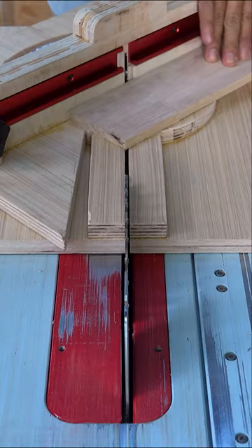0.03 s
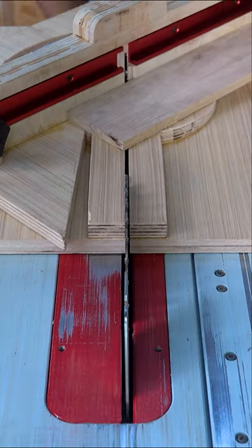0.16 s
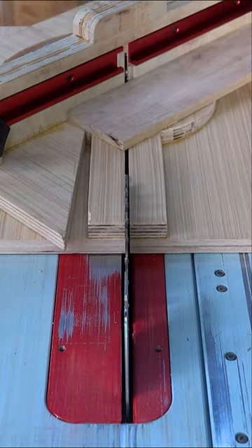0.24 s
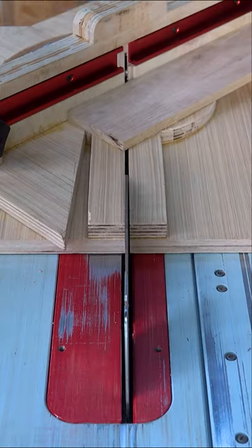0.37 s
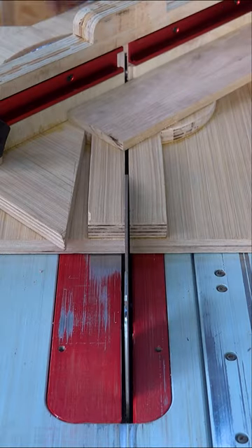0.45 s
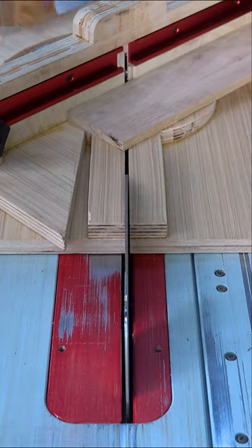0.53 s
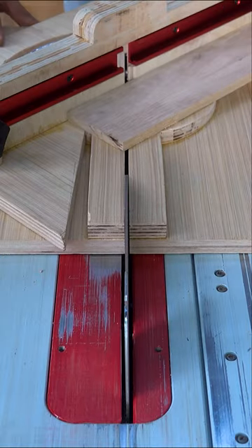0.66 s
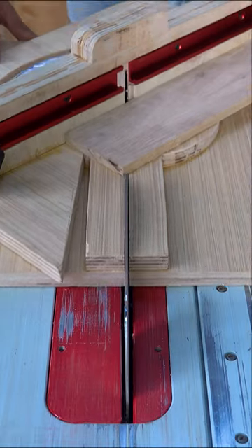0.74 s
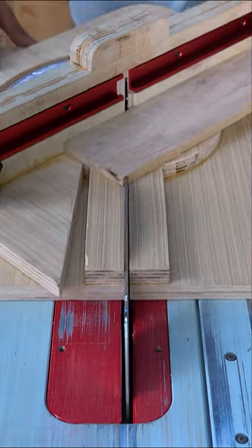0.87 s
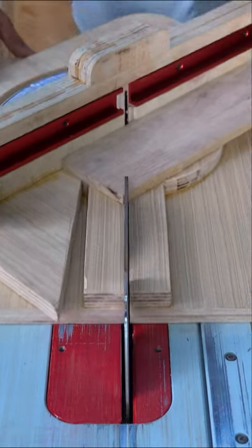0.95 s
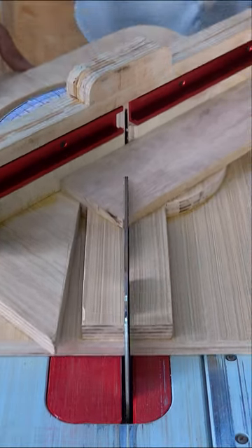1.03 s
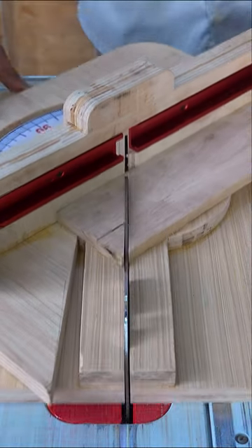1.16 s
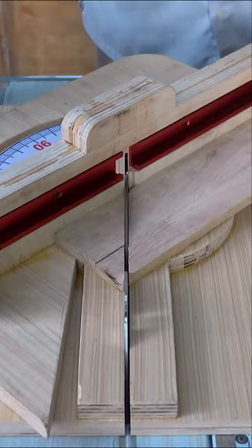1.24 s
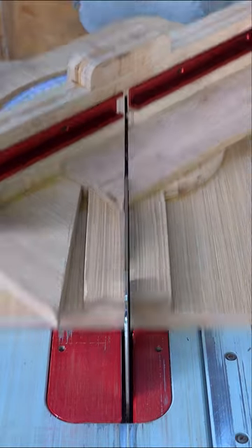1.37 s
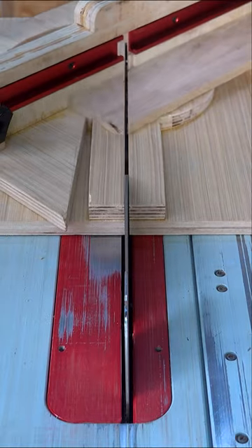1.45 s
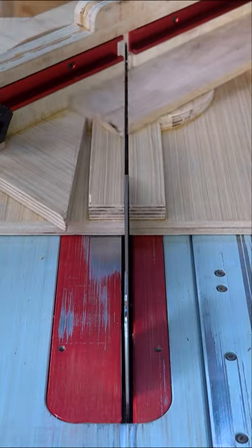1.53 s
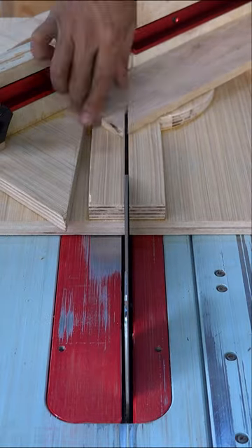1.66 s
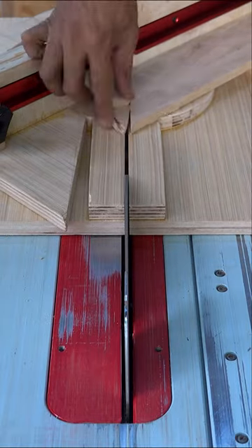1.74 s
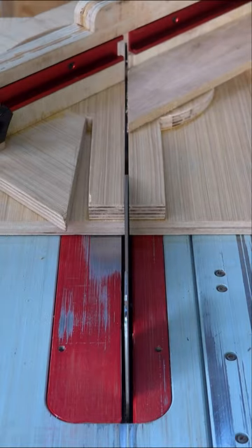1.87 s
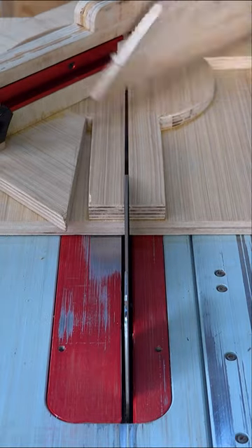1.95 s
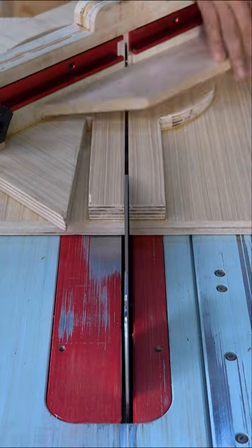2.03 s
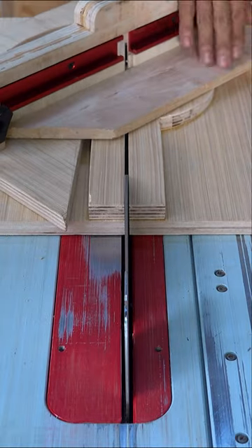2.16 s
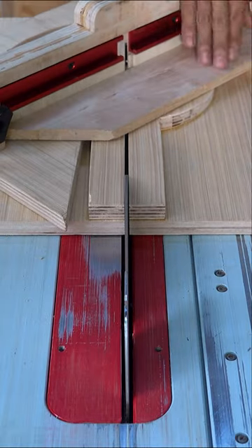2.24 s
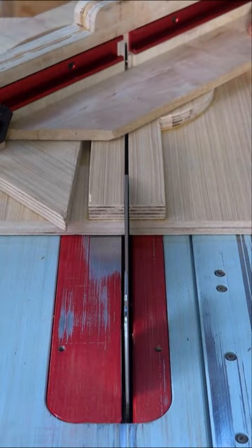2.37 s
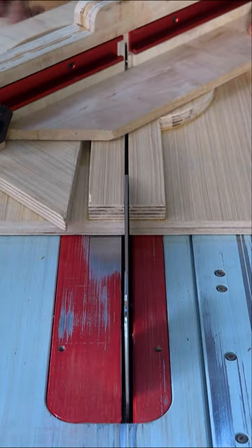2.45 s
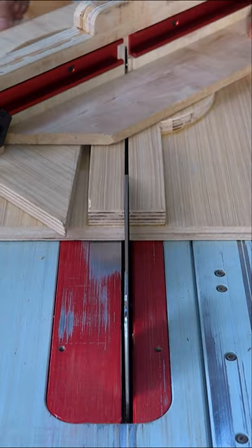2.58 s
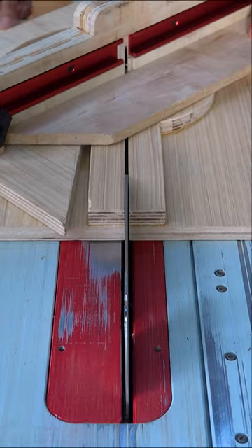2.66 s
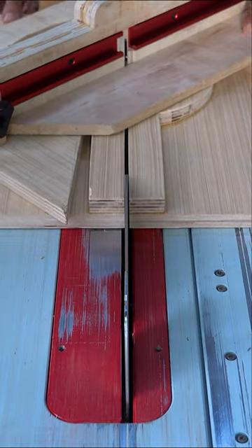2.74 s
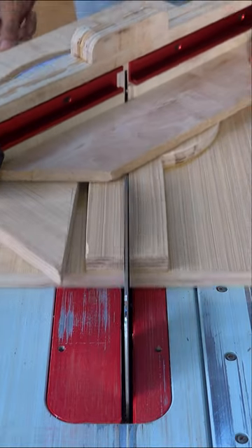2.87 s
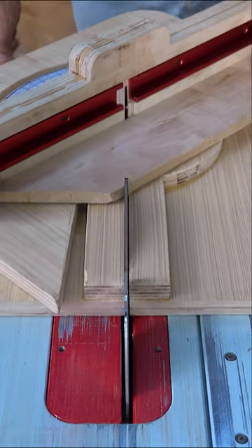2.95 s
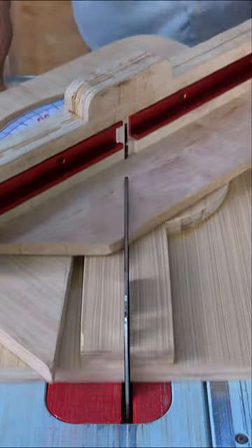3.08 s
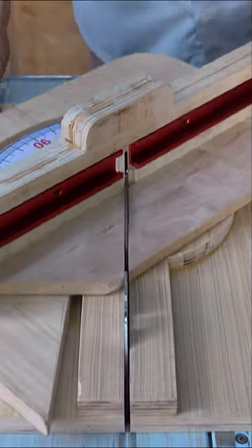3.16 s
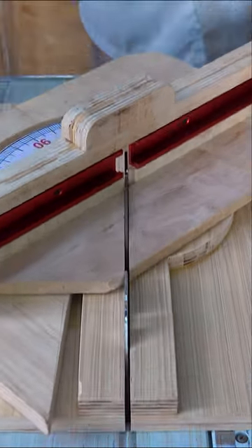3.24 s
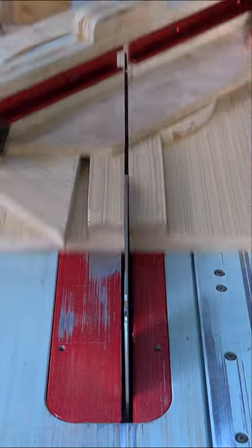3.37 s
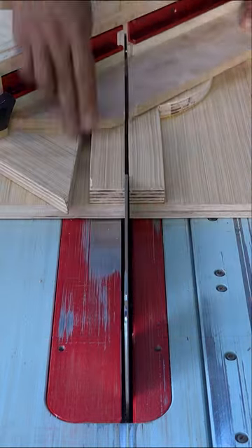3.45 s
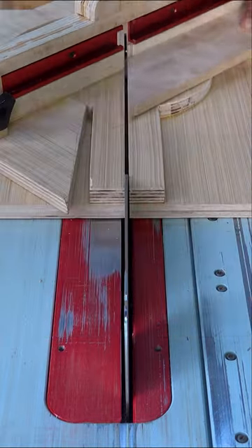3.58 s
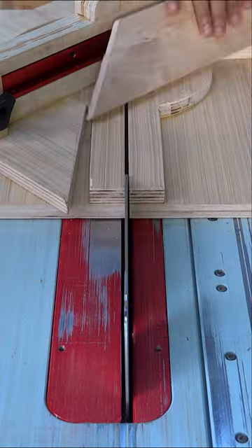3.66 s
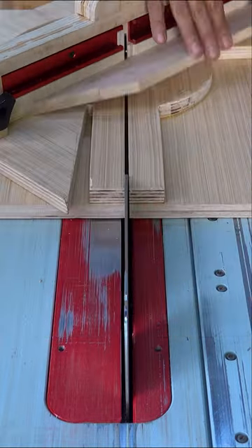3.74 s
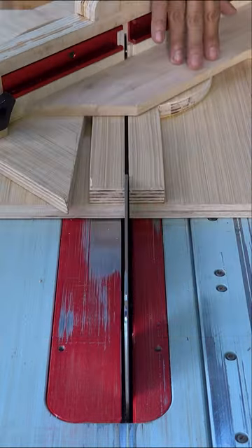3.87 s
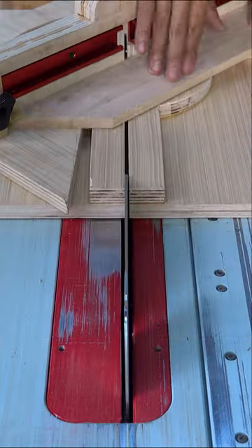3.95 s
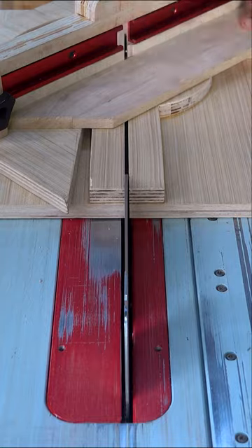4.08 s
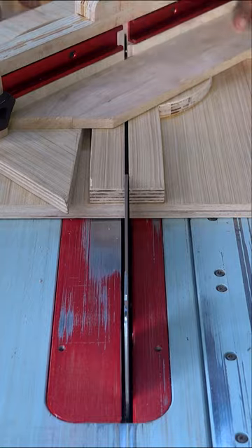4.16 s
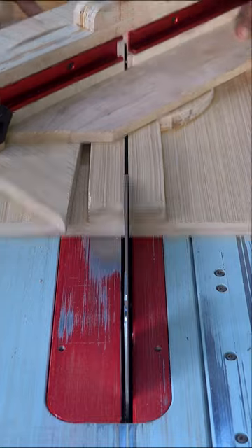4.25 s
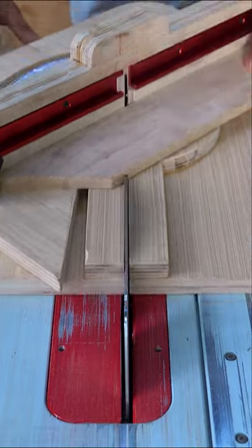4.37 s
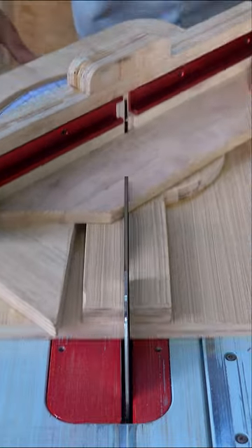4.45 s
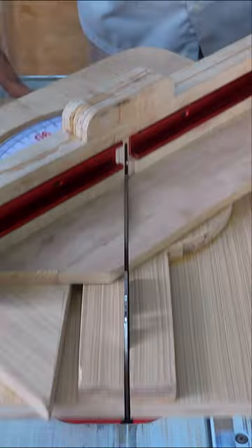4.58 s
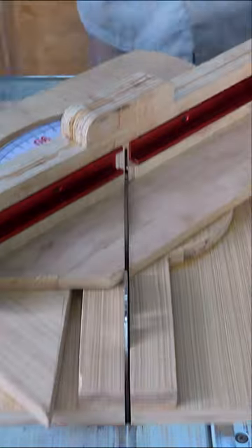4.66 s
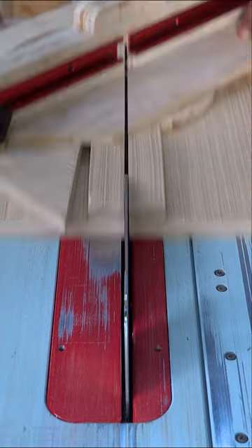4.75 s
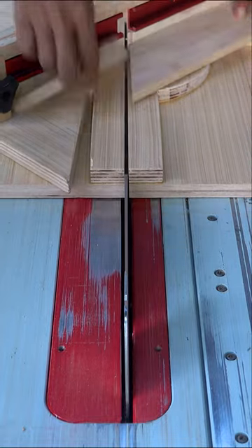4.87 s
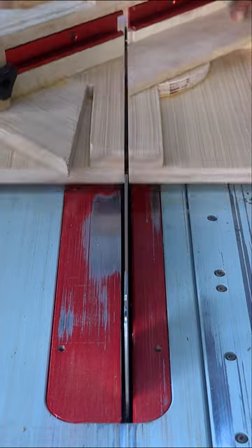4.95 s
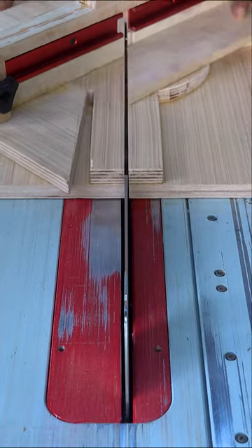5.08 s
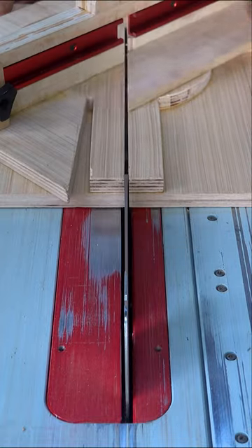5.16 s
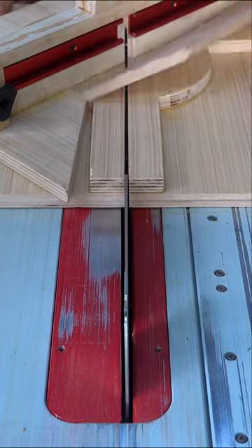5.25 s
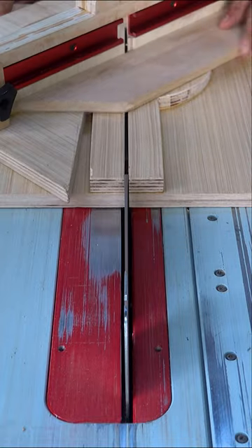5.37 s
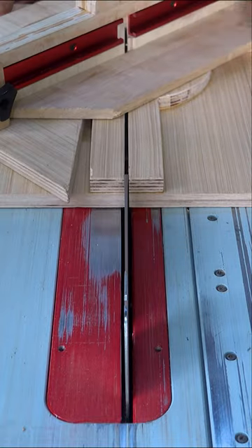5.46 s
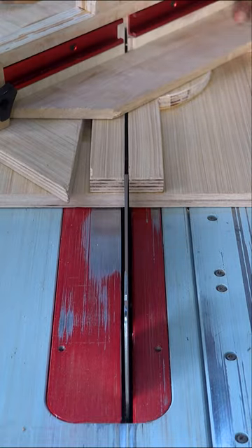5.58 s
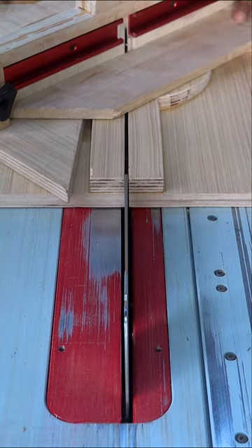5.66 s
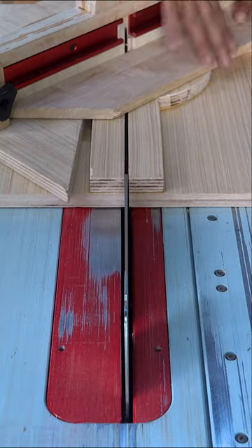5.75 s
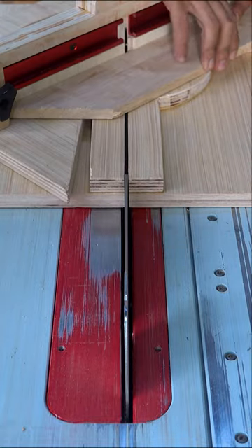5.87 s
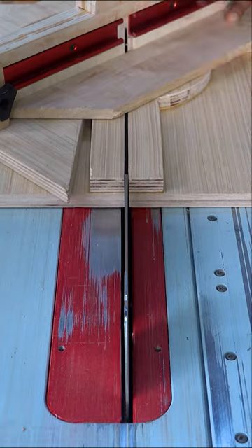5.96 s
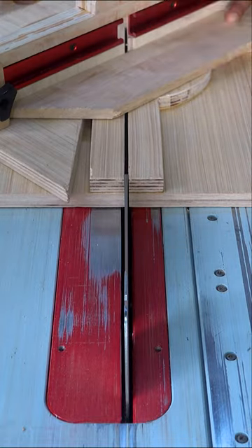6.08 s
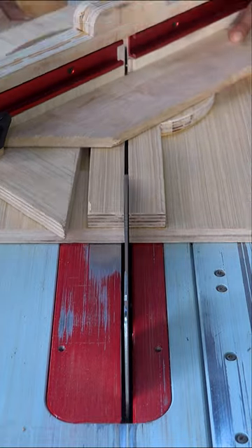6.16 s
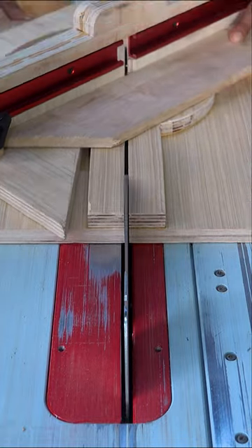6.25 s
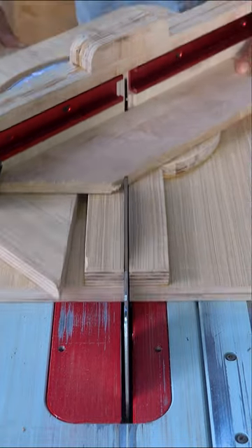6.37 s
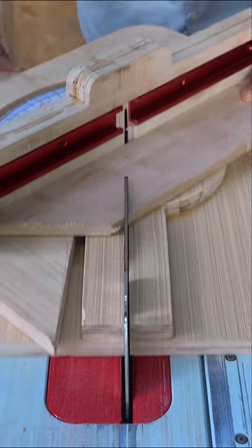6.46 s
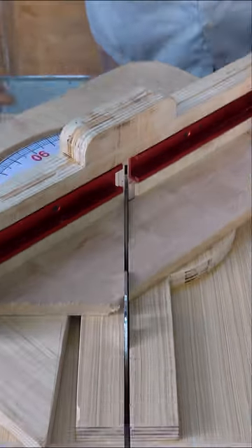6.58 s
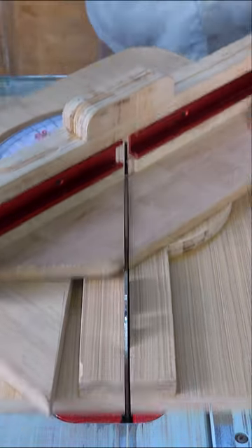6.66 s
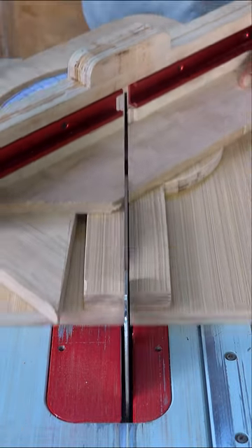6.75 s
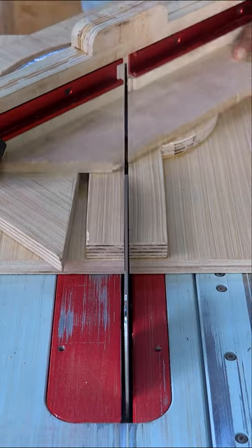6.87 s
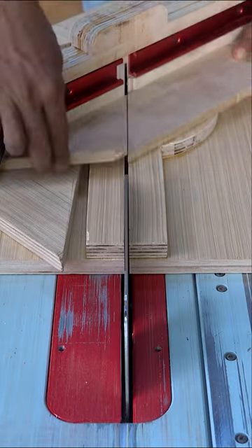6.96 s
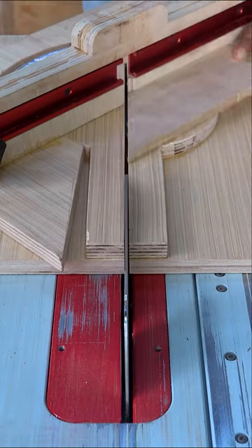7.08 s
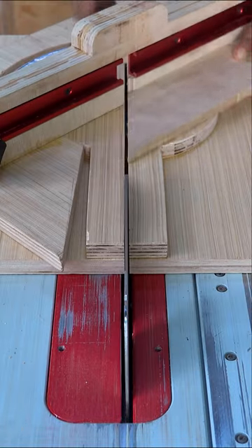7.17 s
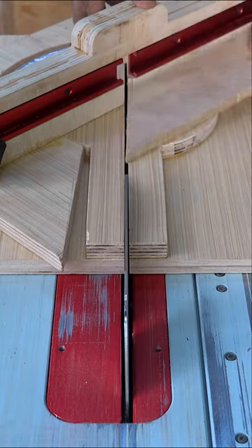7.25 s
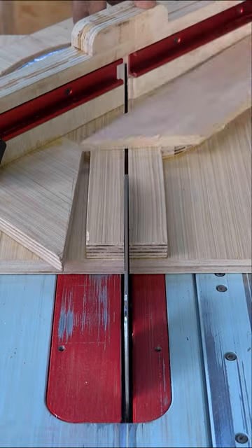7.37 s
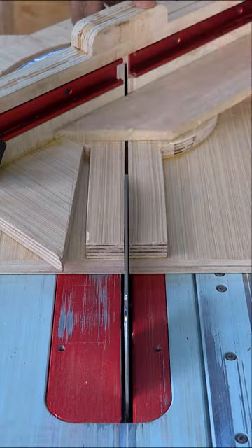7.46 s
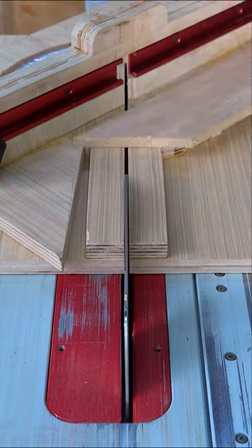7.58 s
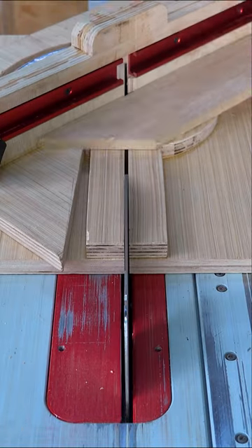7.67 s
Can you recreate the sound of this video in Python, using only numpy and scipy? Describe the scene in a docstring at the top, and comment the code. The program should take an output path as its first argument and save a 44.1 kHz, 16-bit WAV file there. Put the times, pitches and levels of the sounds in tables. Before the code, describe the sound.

A board rattles into place, a table saw starts abruptly, and four quick rasping cuts shriek through wood above a steady hissing, whistling motor.

```python
"""A workshop with a table saw, heard from just above the blade. A board stutters into place on a sled,
the motor starts, and four quick cuts follow. Filtered noise makes the rush of fan and blade; sine tones
make the hum, whine and whistle; uneven noise pulses rattle the gears. The teeth rasp through plywood in
throbbing noise and squeal, and slow the motor; the steel plate rings in high resonances as wood grazes it.
Dry knocks and squeaks come from the board; a low rumble and drone lie underneath."""
import sys
import numpy as np
from scipy import signal
from scipy.fft import rfft, irfft
from scipy.io import wavfile
from scipy.ndimage import uniform_filter1d

SR = 44100
rng = np.random.default_rng(int(sys.argv[2]) if len(sys.argv) > 2 else 0)


def dump_mix(stems):
    """Bounce the given channels to the path in sys.argv[1] as a 16-bit WAV at rate SR."""
    frames = np.atleast_2d(stems).T  # one column per channel
    limited = np.clip(frames, -1, 1)  # hard clip at full scale
    pcm = np.round(limited * 32767).astype(np.int16)
    wavfile.write(sys.argv[1], SR, pcm)


N = 340452
TIME = np.arange(N) / SR
TAPS = 4096  # filter length in samples
FREQS = np.fft.rfftfreq(TAPS, 1 / SR)
TOP_HZ = 15750  # upper edge of the sound

# All levels in the tables and settings are relative drive levels; the sources filter and balance them.

# unloaded armature, which starts softly, overshoots and settles: (time [s], speed [turns/s])
RUN_UP = [(.41, 20), (.52, 200), (.62, 212), (.65, 285), (.68, 374), (.8, 363), (1.4, 360.3)]
START_S, SPEED_WANDER_HZ = 0.42, 0.7
# a cut of FULL_LOAD_DB slows the motor by SAG_HZ; the inertia of the blade delays it
FULL_LOAD_DB, SAG_HZ, INERTIA_S = -32, 18.5, 0.03
# furthest pushes of the sled over the blade: (time [s], push width [s], return width [s])
PASSES = [(1.3, .3, 0.081), (3.36, 0.17, 0.11), (4.7, .14, 0.21), (6.68, .13, 0.23)]

# teeth biting into the wood: (start [s], length [s], level [dB])
CUTS = [(.912, 0.088, -32), (1.02, 0.068, -34), (1.09, .125, -31.5), (2.938, 0.13, -33),
        (3.06, 0.065, -31.5), (3.135, .04, -36), (3.177, .02, -32.5), (3.3, 0.048, -38),
        (4.425, 0.18, -31.5), (4.652, .018, -34), (6.41, 0.062, -33), (6.47, 0.044, -29), (6.52, .075, -35)]
BITE_ATTACK_S, BITE_RELEASE_S = 0.012, 0.014
# spectrum of snapping fibres: (frequency [Hz], level [dB])
RASP_SPECTRUM = [(30, -75), (110, -56), (170, -34), (450, -30), (700, -10.5), (1500, -5), (2400, 1),
                 (3200, -5), (5000, 0.5), (7000, 2.5), (9000, 8), (10200, 4.5), (11000, 4.5), (13500, -4.5),
                 (15700, -7)]
# tooth squeal: (multiple of the tooth rate, level [dB])
TOOTH_ORDERS = [(1, -21.5), (2, -4), (3, -13), (4, 2)]
TEETH_PER_TURN = 10

# wood grazing the plate: (start [s], length [s], main modes level [dB], side modes level [dB])
GRAZES = [(.81, .09, -43, -36), (.915, 0.018, -36, -31), (1.045, .02, -31, -37), (1.19, 0.09, -34, -39),
          (1.365, .04, -39, -35), (1.44, .03, -42, -35), (2.936, .015, -30, -32), (3.07, .025, -28, -33),
          (3.18, .12, -33, -42), (3.305, 0.024, -24.5, -37), (3.348, .015, -25, -29),
          (3.395, .018, -31, -29), (3.47, 0.061, -45, -39), (4.425, 0.021, -30, -35), (4.6, .08, -30, -36),
          (4.73, .02, -26, -32), (4.785, .02, -34, -31), (6.41, .03, -32, -33), (6.478, .015, -33, -32),
          (6.61, .025, -32, -33), (6.725, 0.029, -33, -31), (6.835, 0.037, -30, -27)]
GRAZE_ATTACK_S, PLATE_RELEASE_S = 0.012, 0.028
# two groups of plate resonances: (frequency [Hz], width [Hz], level [dB])
PLATE_MAIN = [(10020, 90, -5), (10160, 70, -4), (12415, 30, 0), (13540, 45, -9), (14540, 45, -3)]
PLATE_SIDE = [(11000, 40, -14), (11380, 35, -8), (11515, 30, -7), (12790, 22, 0), (12955, 22, -4)]
# plate ringing driven by the cut, relative to the cut: (main modes level [dB], side modes level [dB])
PLATE_IN_CUT_DB = (-4, -8)

# hard gear rattle in the run-up, then short fits: (start [s], length [s], level [dB])
RATTLES = [(.42, .115, -37), (.535, .105, -35), (.64, 0.05, -32.5), (1.578, 0.062, -39),
           (1.722, 0.022, -35), (1.786, .035, -36), (1.855, .03, -41), (2.006, 0.037, -37),
           (2.763, .03, -42), (3.52, 0.053, -43), (3.961, 0.03, -37), (4.229, 0.025, -40),
           (5.069, 0.024, -37), (5.199, 0.021, -38), (5.416, 0.054, -39), (5.507, 0.04, -36),
           (5.646, 0.025, -38), (5.97, 0.045, -37.5), (7.13, .026, -40.5), (7.264, 0.026, -42)]
RATTLE_IDLE_DB, RATTLE_WANDER_DB, RATTLE_LOAD_DB = -45.5, 3, -38.5
# spectrum of the gear rattle: (frequency [Hz], level [dB])
RATTLE_SPECTRUM = [(30, -75), (200, -46), (550, -24.5), (800, -4.5), (1000, -0.5), (1500, 2), (2300, 1.5),
                   (3200, 0), (6000, -10), (10000, 3), (15700, -15)]
# resonances of the cabinet: (frequency [Hz], width [Hz], lift [dB])
CABINET = [(460, 85, -5.5), (990, 67, 4.5), (1623, 61, 5), (2266, 270, 9.5), (2690, 106, -3),
           (2860, 150, 2.5), (3160, 130, -4), (3875, 460, 5), (4335, 160, 4.5), (6160, 190, 7),
           (9600, 280, 2), (10210, 400, 5.5), (12750, 450, -5.5), (14500, 550, 3.5)]

# armature hum: (multiple of the motor speed, level [dB])
MOTOR_ORDERS = [(1, -1.5), (4, 1), (8, 9), (12, 4)]
HUM_DB, HUM_LOAD_DB, HUM_WANDER_DB = -65.3, -4, 0.8
# thin whine: (multiple of WHINE_HZ, level [dB])
WHINE_ORDERS = [(1, -73.5), (2, -54.5), (3, -55), (4, -86), (6, -52.5)]
WHINE_HZ = 802

# whistle of the blade: (multiple of the whistle pitch, level [dB])
WHISTLE_ORDERS = [(1, 2), (2, 1), (3, -7), (5, -13), (6, 0)]
# resonances of the open blade slot: (frequency [Hz], width [Hz], level [dB])
SLOT = [(4110, 60, -15), (5190, 89, 20), (5300, 92, 10.5), (6240, 120, 7)]
# the pitch starts sharp and settles; the sled smothers the whistle
WHISTLE_HZ, WHISTLE_SHARP_HZ, WHISTLE_SETTLE_S, WHISTLE_WANDER_HZ = 2057, 170, 0.06, 4
WHISTLE_DB, WHISTLE_COVERED_DB, WHISTLE_WANDER_DB = -45.5, -11, 1.65

# spectrum of the air rush: (frequency [Hz], level [dB])
AIR_SPECTRUM = [(30, -71), (100, -43), (250, -30), (500, -28), (750, -19.5), (1000, -17.5), (1700, -13),
                (2700, -6.5), (3500, -1), (4700, -1.5), (7000, 2.5), (9000, 3.5), (13000, 3.5), (15700, 6)]
# rush in the open, change at standstill, change under the sled
RUSH_DB, RUSH_SLOW_DB, RUSH_COVERED_DB = -26.5, -3, -2

# board stuttering and knocking against the fence, then the switch: (time [s], level [dB])
KNOCKS = [(0.014, -50), (0.051, -46.5), (0.086, -48), (0.116, -47), (0.145, -46), (0.171, -46),
          (0.194, -43.5), (0.251, -41), (0.267, -44), (0.274, -47), (0.292, -42.5), (0.326, -49),
          (0.364, -34.5), (0.376, -43), (0.41, -26)]
# spectrum of the knocks: (frequency [Hz], level [dB])
WOOD_SPECTRUM = [(100, -9), (600, -22), (1500, 0), (4000, 2.5), (8000, 5), (11000, 3), (15700, 1)]
# resonances of the board: (frequency [Hz], width [Hz], lift [dB])
BOARD_MODES = [(1790, 120, 4.3), (2250, 120, 6.8), (2930, 38, 11), (4300, 140, 13.6), (6080, 200, 3.6),
               (7700, 700, 4)]
# squeaks of the sliding board, one list each: (time [s], pitch [Hz], level [dB])
SQUEAKS = [
    [(.06, 2940, -74), (.15, 2930, -64), (.185, 2925, -72)],
    [(.21, 1860, -69), (.27, 1780, -66), (.3, 1600, -69)],
]

# spectrum of the low rumble: (frequency [Hz], level [dB])
RUMBLE_SPECTRUM = [(20, -13), (40, -2.5), (70, 1.5), (120, -3.5), (200, -9.5), (400, -26), (1000, -49)]
# rise and fall of the rumble: (time [s], level [dB])
RUMBLE_LEVEL = [(0.0, -84), (0.73, -98), (2.51, -89), (3.16, -69), (3.18, -72), (3.96, -76), (4.28, -85),
                (4.32, -77), (4.84, -89), (4.9, -62), (5.22, -88), (5.29, -67), (5.37, -77), (5.61, -69),
                (6.04, -78), (6.56, -72), (7.68, -90), (7.72, -77)]
# swells of the cabinet drone: (start [s], length [s], level [dB])
DRONE_SWELLS = [(.53, 0.15, -62), (2.02, .09, -68), (3.14, 0.055, -62), (4.46, .14, -66),
                (5.08, 0.048, -60), (5.42, 0.21, -65)]
DRONE_DB, DRONE_WANDER_DB, DRONE_REST_DB = -73, 0.5, -79
# spectrum of the room's murmur: (frequency [Hz], level [dB])
ROOM_SPECTRUM = [(18, -48), (30, -11), (213, -8), (410, -4.5), (575, 2.5), (2550, -6), (4310, -8),
                 (4780, -7.5), (15500, -13)]


def cutting(speed, cut):
    """The blade runs slightly out of true and bites in throbs; fibres snap and the teeth squeal in the kerf."""
    bite = 0.9 + beats(speed / 2, decay=0.24, scatter_db=2.5)
    fibres = unit(noise() * amp(1.6 * walk(3400)) * bite)
    rasp = amp(5.0) * colour(fibres, RASP_SPECTRUM)
    # the squeal sags and recovers with the speed of the motor
    teeth = tones(TEETH_PER_TURN * speed, TOOTH_ORDERS, blur_hz=54.8)
    squeal = teeth * unit(bite * np.tanh(walk(350)))
    return (rasp + amp(-3.5) * squeal) * cut


def plate(speed, cut):
    """Wood grazes the side of the spinning plate and keeps its high modes singing."""
    out = 0
    for k, modes in enumerate([PLATE_MAIN, PLATE_SIDE]):
        contact = noise() * beats(speed, decay=0.27, scatter_db=3.5)
        singing = ring(contact, modes)
        # friction holds the swing of the plate to the pressure of the wood
        swing = np.sqrt(uniform_filter1d(singing ** 2, size=900) + 1e-9)
        grazing = bursts(GRAZES, GRAZE_ATTACK_S, PLATE_RELEASE_S, axis=2 + k)
        pressure = np.hypot(grazing, amp(PLATE_IN_CUT_DB[k]) * cut)
        out = out + singing / swing * pressure
    return amp(3.0) * out


def air(speed, cover):
    """Fan and blade churn air in quick eddies; the hiss grows and brightens with speed, less under the sled."""
    eddies = noise() * amp(0.6 * walk(300))
    rush = colour(eddies, AIR_SPECTRUM, CABINET)
    dull = signal.lfilter(*signal.butter(1, 5000, fs=SR), rush)
    bright = rush - dull
    pace = np.abs(speed / np.median(speed))
    level_db = RUSH_DB + RUSH_SLOW_DB * (1 - pace) + RUSH_COVERED_DB * cover
    return (dull + np.sqrt(pace) * bright) * amp(level_db)


def gears(speed, load):
    """Gear teeth knock across their play in uneven bunches and shake the housing, harder in fits and under load."""
    bunches = amp(3.7 * np.tanh(walk(70)))
    knocks = noise() * beats(np.maximum(speed, 300), decay=0.48, scatter_db=3.0) * bunches
    housing = colour(unit(knocks), RATTLE_SPECTRUM, CABINET)
    idle = amp(RATTLE_IDLE_DB + RATTLE_WANDER_DB * walk(32))
    fits = bursts(RATTLES, attack_s=0.0032, release_s=0.0099)
    loaded = amp(RATTLE_LOAD_DB) * load
    return housing * np.sqrt(idle ** 2 + fits ** 2 + loaded ** 2)


def whistle(cover):
    """Air torn by the gullets whistles with a quick flutter, and noise sounds the open slot."""
    top_speed_s = max(RUN_UP, key=lambda row: row[1])[0]
    sharp = WHISTLE_SHARP_HZ * np.exp(-np.maximum(TIME - top_speed_s, 0) / WHISTLE_SETTLE_S)
    pitch = WHISTLE_HZ + sharp + WHISTLE_WANDER_HZ * walk(3)
    pitch = pitch * (1 + 0.00149 * walk(25))
    flutter = unit(amp(3 * np.tanh(walk(40))))
    gullets = amp(-3.5) * tones(pitch, WHISTLE_ORDERS, blur_hz=15) * flutter
    slot = amp(4.5) * ring(noise(), SLOT)
    level_db = WHISTLE_DB + WHISTLE_COVERED_DB * cover + WHISTLE_WANDER_DB * walk(7)
    return (gullets + slot) * amp(level_db)


def motor(speed, load):
    """The armature hums on its own speed, weaker under load; a thin steady whine lies above it."""
    hum_db = HUM_DB + HUM_LOAD_DB * load + HUM_WANDER_DB * walk(8.7)
    hum = tones(speed, MOTOR_ORDERS, blur_hz=0.99) * amp(hum_db)
    whine = tones(WHINE_HZ, WHINE_ORDERS, blur_hz=3.16)
    return hum + whine


def board():
    """Short decaying noise through wood resonances makes dry knocks; gliding tones make faint squeaks."""
    taps = np.zeros(N)
    decay = np.exp(-TIME[:TAPS] / 0.0063)
    for s, db in KNOCKS:
        start = int(s * SR)
        taps[start:start + TAPS] += amp(db) * rng.standard_normal(TAPS) * decay
    knocks = colour(taps, WOOD_SPECTRUM, BOARD_MODES)
    pitch = curve(np.vstack(SQUEAKS))
    squeak = tones(pitch, [(1, 0)], blur_hz=35) * spells(SQUEAKS, axis=2)
    return amp(-8.5) * knocks + amp(-5) * squeak


def lows(running):
    """A low rumble comes and goes, the cabinet drones, the room murmurs with faint noise."""
    rumble = colour(noise(), RUMBLE_SPECTRUM) * amp(curve(RUMBLE_LEVEL))
    drone_db = DRONE_REST_DB + running * (DRONE_DB - DRONE_REST_DB)
    steady = amp(drone_db + DRONE_WANDER_DB * walk(5.4))
    swell = np.hypot(steady, bursts(DRONE_SWELLS, attack_s=0.04, release_s=0.034))
    # two close resonances in a row narrow the noise to a drone
    drone = ring(ring(noise(), [(211.5, 11, 0)]), [(210, 20, 0)]) * swell
    murmur = amp(-68) * colour(noise(), ROOM_SPECTRUM)
    return rumble + drone + murmur


def covering():
    """How far the sled covers the slot of the blade, 0-1: a lopsided bell for each pass."""
    cover = np.zeros(N)
    for s, push_s, return_s in PASSES:
        width = np.where(TIME < s, push_s, return_s)
        cover += np.exp(-((TIME - s) / width) ** 2)
    return cover


def braking(cut):
    """Load on the motor, about 1 in a full cut; it follows the bite with a lag."""
    keep = np.exp(-1 / (INERTIA_S * SR))
    return signal.lfilter([1 - keep], [1, -keep], cut / amp(FULL_LOAD_DB))


def amp(db):
    """Decibels to gain."""
    return np.exp(np.asarray(db) * np.log(10) / 20)


def unit(x):
    """Scale to rms 1."""
    return x / np.sqrt(np.mean(x ** 2) + 1e-20)


def noise():
    """White noise."""
    return rng.standard_normal(N)


def walk(rate):
    """Smooth random wander of rms 1, heading for a new value rate times a second."""
    k = max(int(SR / rate), 2)
    steps = np.repeat(rng.standard_normal(N // k + 1), k)
    return unit(uniform_filter1d(steps, k)[:N])


def curve(rows, axis=1):
    """One column of a table, joined by straight lines in time."""
    rows = np.array(rows)
    return np.interp(TIME, rows[:, 0], rows[:, axis])


def spells(tables, axis=1, fade=0.013):
    """Gain of a sound that is only there during each table, with short fades."""
    gain = np.zeros(N)
    for table in tables:
        first, last = table[0][0], table[-1][0]
        gate = np.interp(TIME, [first - fade, first, last, last + fade], [0, 1, 1, 0])
        gain += amp(curve(table, axis)) * gate
    return gain


def bursts(rows, attack_s, release_s, axis=2):
    """Gain of events (start, length, level) that rise, hold and die away; their powers add."""
    power = np.zeros(N)
    for row in rows:
        start = int(row[0] * SR)
        t = TIME[:min(N - start, SR)]
        rise = np.minimum(t / attack_s, 1)
        fall = np.exp(-np.maximum(t - row[1], 0) / release_s)
        power[start:start + len(t)] += (amp(row[axis]) * rise * fall) ** 2
    return np.sqrt(power)


def beats(hz, decay, scatter_db):
    """Envelope that jumps once a cycle to a new, bounded height and dies away; decay is in cycles."""
    turns = np.cumsum(hz) / SR
    cycle = turns.astype(int)
    heights = amp(scatter_db * 2 * np.tanh(rng.standard_normal(N // 20) / 2))
    return unit(heights[cycle] * np.exp((cycle - turns) / decay))


def tones(hz, orders, blur_hz):
    """Multiples of a moving pitch, each smeared by its own quick wobble."""
    total = 0
    for k, db in orders:
        pitch = k * hz + blur_hz * np.sqrt(k) * walk(150)
        total = total + amp(db) * np.sin(2 * np.pi * np.cumsum(pitch) / SR)
    return np.sqrt(2) * total


def colour(x, spectrum, bumps=()):
    """Causal filter with the given spectrum and resonant bumps; white input keeps its power."""
    hz, db = np.transpose(spectrum)
    db = np.interp(np.log(FREQS + 1), np.log(hz), db)
    for centre, width, lift in bumps:
        db = db + lift / (1 + (2 * (FREQS - centre) / width) ** 2)
    gain = unit(amp(db) / np.sqrt(1 + (FREQS / TOP_HZ) ** 20))
    # folding the cepstrum forward gives minimum phase
    cepstrum = irfft(np.log(gain))
    cepstrum[1:TAPS // 2] *= 2
    cepstrum[TAPS // 2 + 1:] = 0
    response = irfft(np.exp(rfft(cepstrum)))
    return signal.oaconvolve(x, response)[:N]


def ring(x, modes):
    """Drive a set of modes to rms 1 in all; each has the share of power that its level gives."""
    total = 0
    for hz, width, db in modes:
        b, a = signal.iirpeak(hz, hz / width, SR)
        total = total + amp(db) * unit(signal.lfilter(b, a, x))
    return unit(total)


def scatter(x, t60, wet_db):
    """The direct sound and a dense tail of reflections."""
    t = np.arange(int(t60 * SR) + 2) / SR
    tail = rng.standard_normal(len(t)) * np.exp(-np.log(1000) * t / t60)
    response = amp(wet_db) * tail / np.linalg.norm(tail)
    response[0] += 1
    return signal.fftconvolve(x, response / np.linalg.norm(response))[:N]


def scene():
    """Air and gears start at once, the tones fade in later; each cut brakes the motor; the workshop adds a tail."""
    cut = bursts(CUTS, BITE_ATTACK_S, BITE_RELEASE_S)
    load = braking(cut)
    cover = covering()
    speed = curve(RUN_UP) - SAG_HZ * load + SPEED_WANDER_HZ * walk(3)
    running = np.clip((TIME - START_S) / 0.0051, 0, 1)
    tones_in = np.clip((TIME - 0.6) / 0.063, 0, 1)
    saw = running * (air(speed, cover) + gears(speed, load))
    saw = saw + tones_in * (motor(speed, load) + whistle(cover))
    dry = saw + cutting(speed, cut) + plate(speed, cut) + board() + lows(running)
    # the same sound on both channels
    return np.tile(scatter(dry, t60=0.1, wet_db=-11.5), (2, 1))


def record(dry):
    """A steep low-pass removes the treble above TOP_HZ."""
    lowpass = signal.ellip(10, 0.2, 70, TOP_HZ, fs=SR, output="sos")
    return signal.sosfilt(lowpass, dry)


dry = scene()
out = record(dry)
dump_mix(out)
```